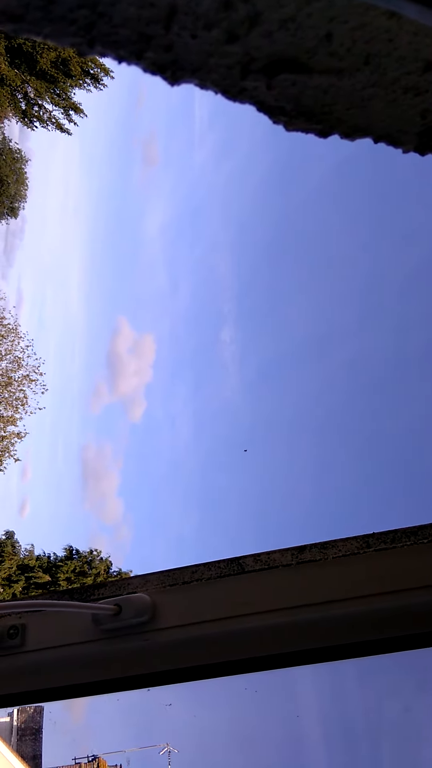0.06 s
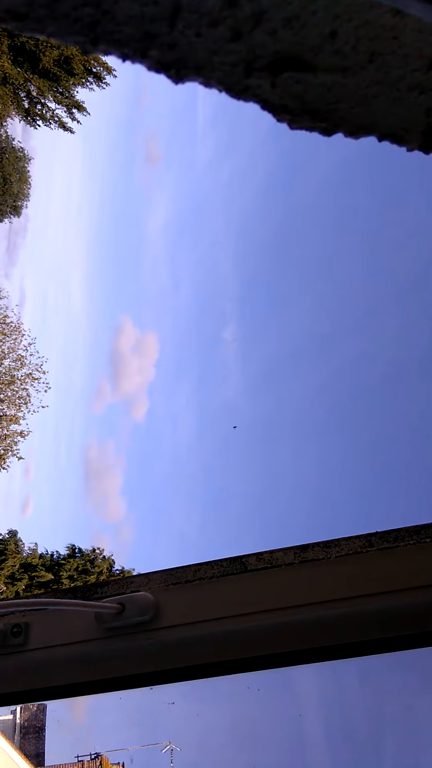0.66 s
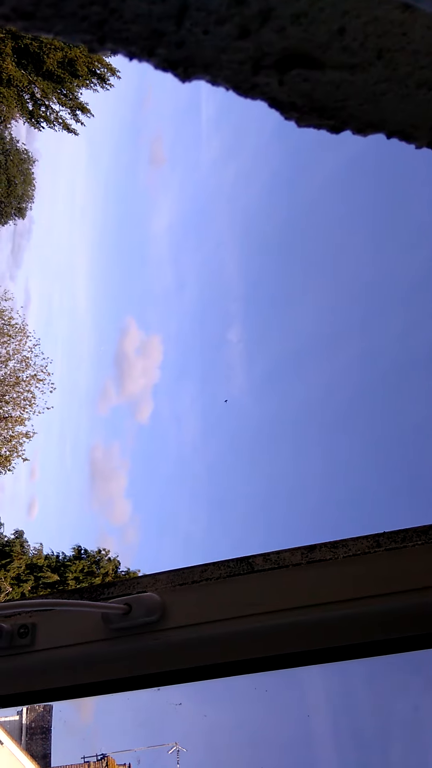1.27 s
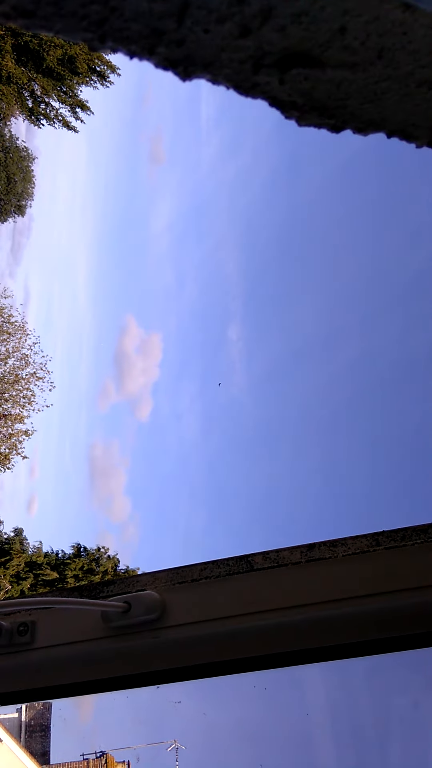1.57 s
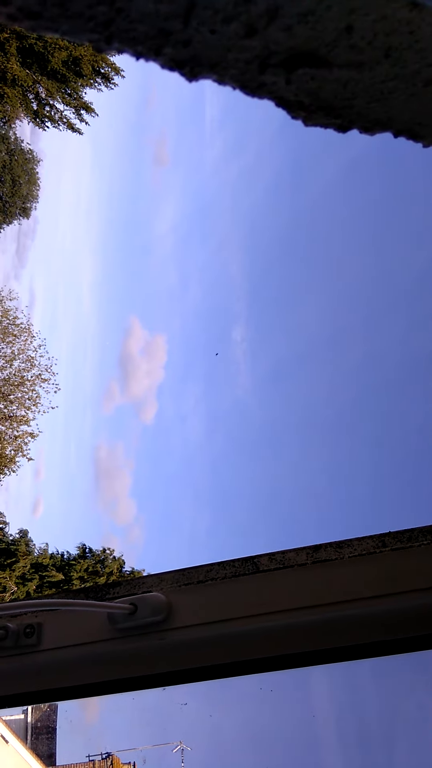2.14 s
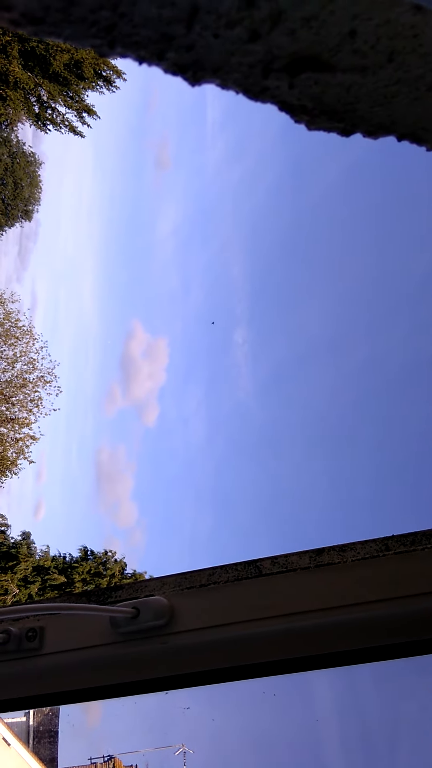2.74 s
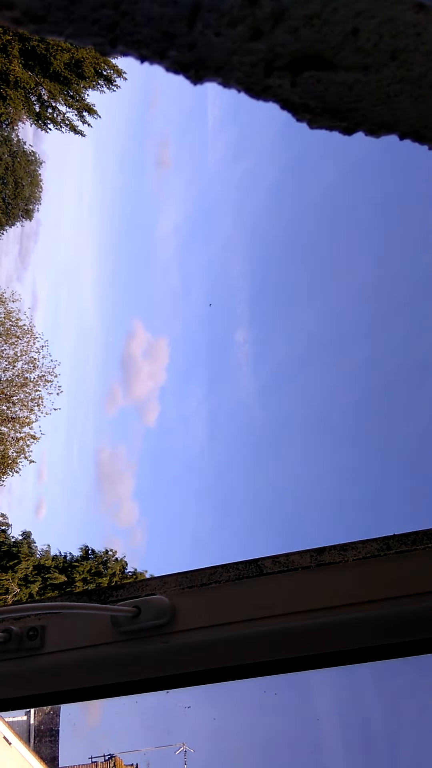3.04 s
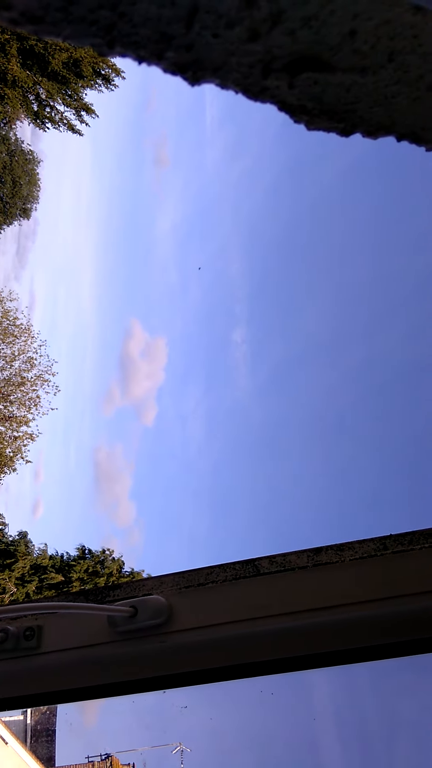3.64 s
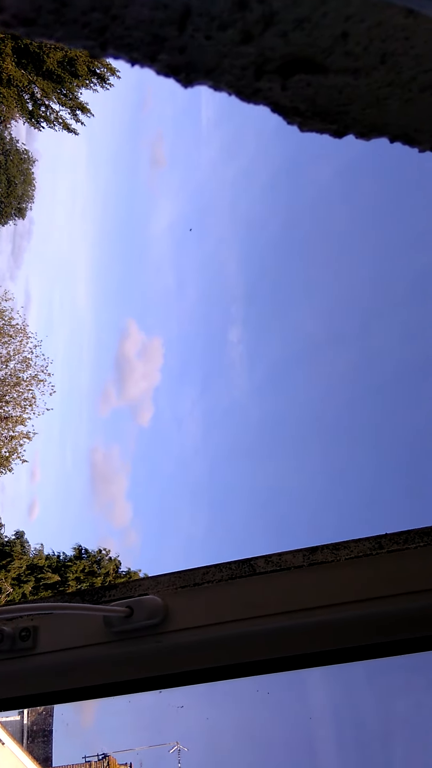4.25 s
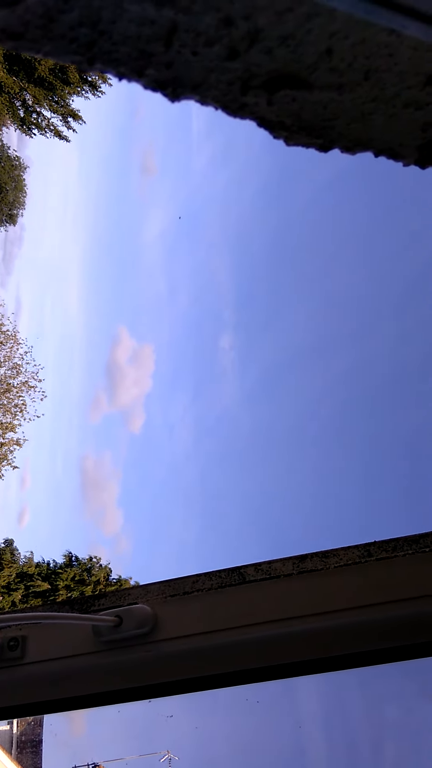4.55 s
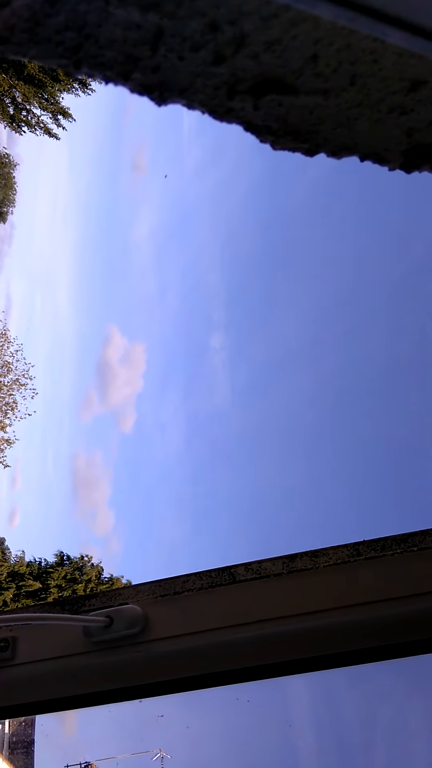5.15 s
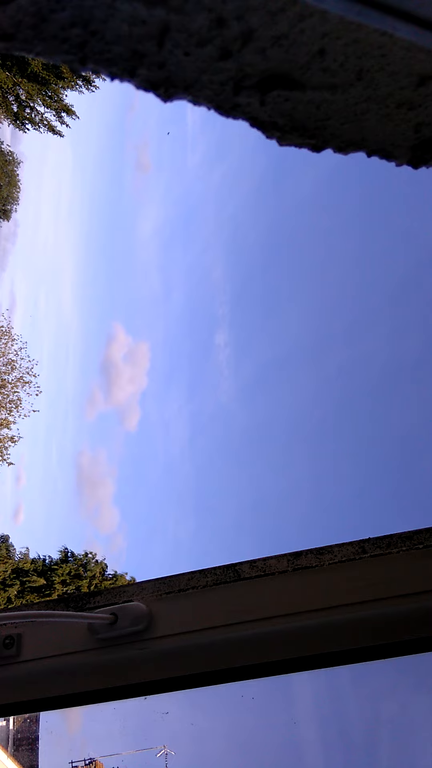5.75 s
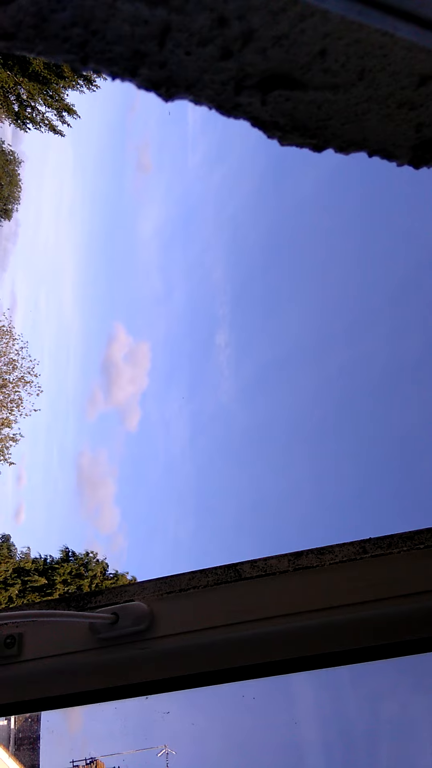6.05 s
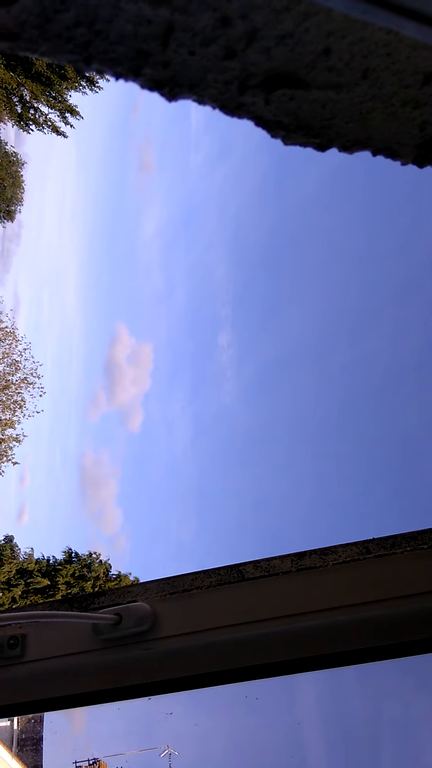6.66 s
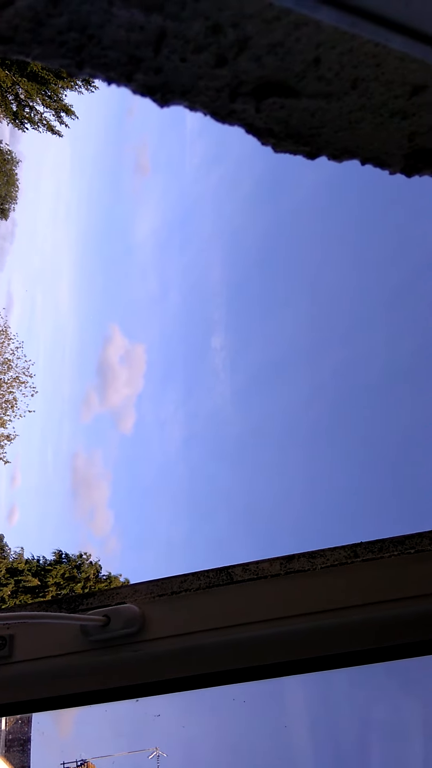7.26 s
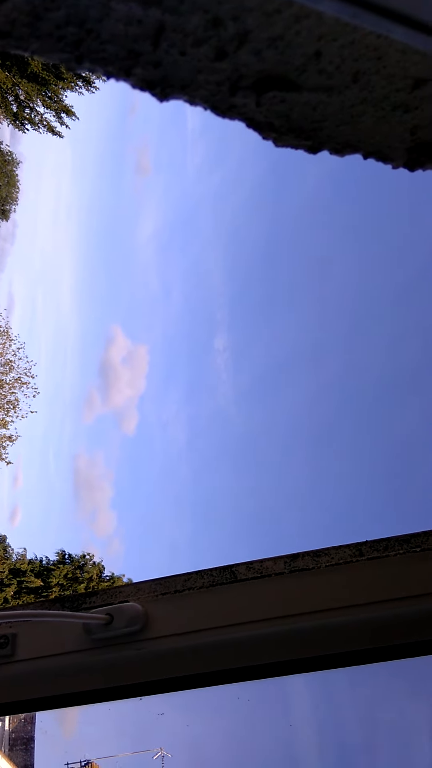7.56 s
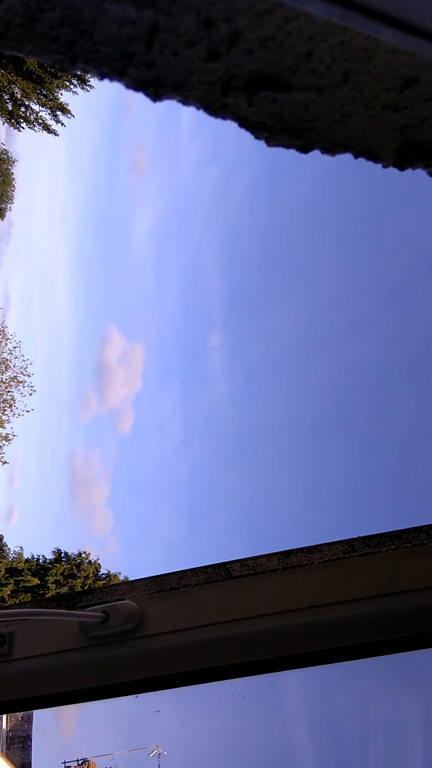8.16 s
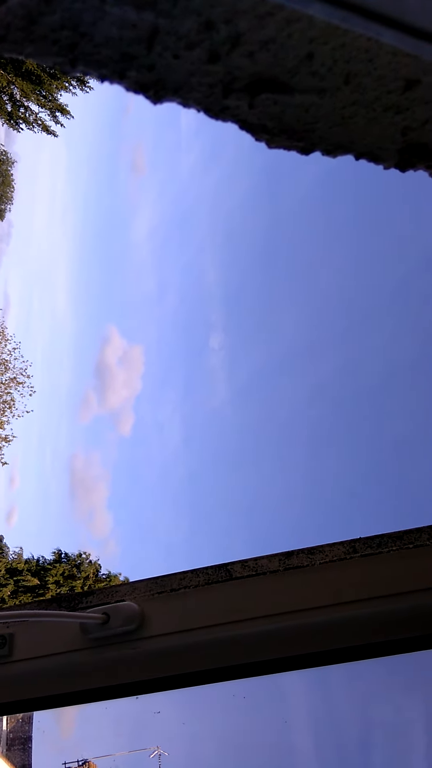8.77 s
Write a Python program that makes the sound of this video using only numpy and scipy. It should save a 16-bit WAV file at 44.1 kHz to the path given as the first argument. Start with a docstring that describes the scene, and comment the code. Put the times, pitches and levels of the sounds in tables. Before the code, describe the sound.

A quiet, steady murmur of far traffic and a faint microphone hiss run throughout, outdoors. A distant engine drones at a low, even pitch, swelling from about 2 seconds, strongest between 3 and 5.5 seconds, with a faint moan near 4.4 seconds, then thinning and wavering. A breeze touches the microphone from about 1 second, making soft, dull rumbles and bumps between 2 and 3.6 seconds. It drops away around 4 seconds. From about 5.2 seconds stronger gusts buffet the microphone with irregular low thumps, flutter and pops, well above the background. They hit hardest near 6.2 seconds, from 7 to 7.4 seconds and from 8.2 to 8.5 seconds, continuing until the end near 9 seconds. One thin, far bird note at about 6.5 seconds and a few tiny ticks are barely audible in the hiss.

```python
"""Far traffic murmurs outdoors and a distant engine drones at the harmonics of its firing rate,
swelling and fading, with a faint moan at its height. A breeze starts to buffet the microphone:
its turbulent pressure makes soft rumbles first, then gusts whose small eddies pop against the port.
One thin far bird note and a few tiny ticks sit in the microphone's hiss."""
import sys
import numpy as np
from scipy import signal
from scipy.fft import rfft, irfft, next_fast_len
from scipy.io import wavfile
from scipy.ndimage import uniform_filter1d

SR = 44100
rng = np.random.default_rng(int(sys.argv[2]) if len(sys.argv) > 2 else 0)


def generate_wav(sig):
    """Save sig (samples, or channels by samples) to the path in sys.argv[1] as 16-bit PCM at SR."""
    pcm = np.round(np.clip(np.atleast_2d(sig).T, -1, 1) * 32767).astype(np.int16)
    wavfile.write(sys.argv[1], SR, pcm)


N = 388521
TIME = np.arange(N) / SR


def gain_of(db):
    """Amplitude ratio of a level in decibels."""
    return 10 ** (np.asarray(db) / 20)


def spectrum_db(points, hz):
    """Level of a spectrum at hz, interpolated on a logarithmic frequency axis."""
    f, level_db = np.transpose(points)
    return np.interp(np.log(hz + 1), np.log(f + 1), level_db)


def follow(rows):
    """Linear interpolation of rows (time, values...) at every sample."""
    times, *columns = np.transpose(rows)
    return [np.interp(TIME, times, column) for column in columns]


def add(mix, start_s, sound):
    """Superposition: the sound adds to the mix from start_s on."""
    part = mix[round(start_s * SR):][:len(sound)]
    part += sound[:len(part)]


def noise(shape):
    """Spectral shaping: white noise is given the amplitude spectrum shape(Hz) and scaled to rms 1."""
    size = next_fast_len(N)
    white = rfft(rng.standard_normal(size))
    shaped = irfft(white * shape(np.fft.rfftfreq(size, 1 / SR)), size)[:N]
    return shaped / np.sqrt(np.mean(shaped ** 2) + 1e-20)


def drift(rate_hz):
    """Random modulation of rms 1: noise low-passed at about rate_hz."""
    return noise(lambda f: np.exp(-(f / rate_hz) ** 2))


def hiss():
    """Microphone self-noise; amplitude modulation of a top treble band adds flicker and ticks."""
    # self-noise spectrum: (frequency [Hz], spectral density [dB])
    colour = [(500, -7.5), (2500, -2.5), (4200, -1.5), (6500, -5), (8500, -6), (10500, -4), (12100, -4),
              (13000, 0), (14300, -5.5)]
    # tiny bright ticks: (time [s], level [dB])
    ticks = [(1.995, -72), (3.379, -68), (5.222, -69), (5.888, -70), (5.962, -68), (6.347, -68)]
    steady = gain_of(-72) * noise(lambda f: gain_of(spectrum_db(colour, f)))
    treble_gain = gain_of(-83 + 3 * drift(30) + 1.3 * drift(7))
    for s, db in ticks:
        add(treble_gain, s, gain_of(db) * np.exp(-TIME[:SR // 10] / 0.0056))
    return steady + treble_gain * noise(lambda f: np.exp(-((f - 11800) / 1200) ** 2))


def traffic():
    """Many far vehicles sum incoherently; air absorption and screening by houses take the treble."""
    # spectrum of the murmur: (frequency [Hz], spectral density [dB])
    colour = [(15, -1), (55, -0.5), (130, -3), (220, -4.5), (330, -10.5), (450, -11.5), (850, -10.5),
              (1200, -14.5), (1700, -18.5), (2200, -29.5), (3200, -45)]
    # its slow swell: (time [s], level [dB])
    swell = [(0, -58), (1.5, -57), (3, -56.5), (4.5, -57), (5.5, -56), (6.6, -56.5), (7.7, -57),
             (8.81, -55.5)]
    murmur = noise(lambda f: gain_of(spectrum_db(colour, f)))
    return murmur * gain_of(follow(swell)[0] + 0.08 * drift(5))


def bird():
    """One far note: a nearly pure tone with slight random frequency modulation."""
    # course of the note: (time [s], frequency [Hz], level [dB])
    note = [(6.41, 5190, -96), (6.46, 5200, -86), (6.5, 5220, -78), (6.54, 5170, -89), (6.68, 5210, -96)]
    hz, level_db = follow(note)
    sounding = (TIME > note[0][0]) & (TIME < note[-1][0])
    cycles = np.cumsum(hz * (1 + 0.002 * drift(40))) / SR
    return np.sqrt(2) * sounding * gain_of(level_db) * np.sin(2 * np.pi * cycles)


def moan(peak_s=4.43, width_s=0.28, hz=512, width_hz=10, level_db=-65):
    """Narrow-band noise is heard as a pitch: a faint tone that swells once above the drone."""
    swell = np.exp(-((TIME - peak_s) / width_s) ** 2)
    return gain_of(level_db) * swell * noise(lambda f: np.exp(-((f - hz) / width_hz) ** 2))


def engine():
    """Periodic firing gives a harmonic series, which fades in and out in moving air, over exhaust rush."""
    # course of the drone: (time [s], firing rate [Hz], level [dB], gain of upper harmonics and rush [dB])
    drone = [(0, 81.64, -60, -1), (1.2, 82.1, -60.5, 2.5), (1.7, 81.9, -66.5, 7.5), (2.3, 81.2, -56, 1.5),
             (3.2, 81.1, -50.5, -9), (3.8, 82.04, -49, -3), (4.5, 80.9, -49.5, -1), (5.3, 81.8, -48.5, -1),
             (6, 81.54, -53, 4.5), (6.55, 81.36, -66, 17), (7.7, 80.75, -55, 3.5), (8.81, 81.9, -58, 9)]
    # harmonics of the firing rate: (harmonic number, relative level [dB])
    harmonics = [(1, -7), (2, 0), (3, -15), (4, -15), (5, -21), (6, -28.5), (7, -28), (8, -33.5)]
    # exhaust resonances: (centre frequency [Hz], width [Hz], relative level [dB])
    exhaust = [(276, 48, 1), (480, 40, -6)]
    firing_hz, level_db, bright_db = follow(drone)
    cycles = np.cumsum(firing_hz * (1 + 0.00385 * drift(5.33))) / SR
    tone = np.zeros(N)
    for k, db in harmonics:
        upper = k > 2
        fading_db = (2.5 if upper else 0.7) * drift(4.1)
        partial = np.sin(2 * np.pi * (k * cycles + rng.random()))
        tone += gain_of(db + upper * bright_db + fading_db) * partial
    rush = noise(lambda f: sum(gain_of(db) * np.exp(-((f - hz) / width) ** 2)
                               for hz, width, db in exhaust))
    return gain_of(level_db) * (np.sqrt(2) * tone + gain_of(bright_db - 16.5) * rush)


def airflow(lumps_db=5, breeze_reach_hz=103):
    """Breeze and gusts add in power; gives the level and the reach, the span of a 20 dB spectral fall."""
    # light breeze between gusts: (time [s], level [dB])
    breeze = [(0, -78), (0.95, -72), (1.1, -56.5), (1.9, -56.5), (2.5, -49), (3.7, -50), (4.1, -62),
              (4.45, -66), (4.57, -52), (5.0, -45.5), (5.55, -49), (6.5, -48.5), (7.6, -46), (8.81, -46)]
    # gusts at the microphone: (peak time [s], duration [s], level [dB], reach [Hz])
    gusts = [(1.14, 0.16, -48, 116), (1.425, 0.095, -52.5, 102), (1.758, 0.08, -49, 98),
             (2.064, 0.062, -40, 125), (2.297, 0.043, -38.5, 170), (2.615, 0.28, -48.5, 108),
             (2.828, 0.037, -32.5, 105), (2.912, 0.072, -35, 153), (2.988, 0.045, -30.5, 123),
             (3.134, 0.067, -40, 115), (3.454, 0.039, -32, 146), (3.505, 0.04, -36, 120),
             (3.606, 0.15, -44, 107), (5.247, 0.064, -35, 196), (5.386, 0.079, -27.5, 292),
             (5.446, .04, -39, 180), (5.63, 0.059, -29, 276), (5.818, 0.087, -33, 153),
             (6.056, 0.063, -30.5, 223), (6.175, 0.086, -31.5, 402), (6.269, 0.074, -22, 249),
             (6.364, 0.052, -31, 214), (6.674, 0.053, -27.5, 198), (6.885, 0.17, -39.5, 120),
             (7.008, 0.052, -21.5, 310), (7.088, 0.061, -25, 290), (7.205, 0.072, -27.5, 225),
             (7.29, 0.084, -25.5, 605), (7.411, .12, -23.5, 179), (7.551, 0.091, -33, 208),
             (7.828, .11, -31.5, 147), (7.936, 0.16, -38.5, 160), (8.241, 0.046, -24.5, 400),
             (8.396, 0.087, -24, 339.5), (8.461, 0.063, -26, 380), (8.566, .06, -37.5, 98),
             (8.66, 0.046, -31, 200), (8.75, 0.073, -30.5, 230)]
    power = gain_of(follow(breeze)[0] + lumps_db * drift(4)) ** 2
    weighted_reach = power * breeze_reach_hz
    for s, length, db, reach_hz in gusts:
        near = slice(max(round((s - 2 * length) * SR), 0), round((s + 2 * length) * SR))
        age = (TIME[near] - s) / length
        rise, fall = abs(age / 0.555) ** 3.5, abs(age / 0.6) ** 2.6
        swell = np.exp(-np.where(age < 0, rise, fall))
        gust_power = (gain_of(db) * swell) ** 2
        power[near] += gust_power
        weighted_reach[near] += gust_power * reach_hz * swell ** 0.28  # reach shrinks as the gust weakens
    return 10 * np.log10(power), weighted_reach / power


def turbulence(level_db, reach_hz, pivot_hz=57.5, flutter_db=7.5):
    """Turbulent pressure at the port falls exponentially with frequency; faster air flattens the fall."""
    # buffeting spectrum before the tilt: (frequency [Hz], spectral density [dB])
    buffet = [(10, 4), (45, 0.9), (100, 0.8), (200, -2), (320, -3), (600, -10), (1200, 2), (2200, -40)]
    centres = 1500 * np.linspace(0, 1, 13) ** 2
    widths = np.gradient(centres)
    flutter = drift(59)  # small eddies come in clumps, which the upper bands share
    pressure = np.zeros(N)
    for hz, width, triangle in zip(centres[1:-1], widths[1:-1], np.eye(len(centres))[1:-1]):
        band = noise(lambda f: np.sqrt(np.interp(f, centres, triangle)))
        # the air speed, more than chance, sets each band's strength from moment to moment
        envelope = abs(signal.hilbert(band, next_fast_len(N))[:N])
        power = uniform_filter1d(envelope ** 2 / 2, size=1000)
        steadied = band / np.sqrt(power + 0.14)
        colour_db = spectrum_db(buffet, hz) - 20 * max(hz - pivot_hz, 0) / reach_hz
        clumps_db = flutter_db * min(hz / 300, 1) * flutter
        pressure += steadied * np.sqrt(width / 110) * gain_of(colour_db + clumps_db)
    return pressure * gain_of(level_db)


def shed_eddies(level_db, reach_hz, per_s=80, min_reach_hz=240):
    """Fast air sheds lesser eddies at random, scaled to its level: rows as eddy_pops takes them."""
    at = np.flatnonzero(rng.random(N) < per_s / SR)
    strength, spread = rng.standard_normal((len(at), 2)).T
    peak_db = level_db[at] - 5.5 + 0.5 * strength
    centre_hz = 213 * np.exp(0.15 * spread)
    rows = np.column_stack([TIME[at], peak_db, centre_hz])
    return list(rows[reach_hz[at] > min_reach_hz])


def eddy_pops(rows, rolloff=1.63, edge_hz=2300):
    """Each eddy is a bipolar pressure pulse, one push and pull; the smaller it is, the sharper the pop."""
    pressure, window = np.zeros(N), np.hanning(4096)
    f = np.fft.rfftfreq(len(window), 1 / SR)
    for (s, db, hz), angle in zip(rows, rng.uniform(0, 2 * np.pi, len(rows))):
        spectrum = f / hz * np.exp(-(f / hz) ** rolloff / rolloff) * np.exp(-(f / edge_hz) ** 8)
        analytic = np.fft.fftshift(np.fft.ifft(spectrum, len(window))) * window
        # the angle at which it meets the port decides whether push or pull comes first
        pulse = (analytic * np.exp(1j * angle)).real / abs(analytic).max()
        add(pressure, s - len(window) / 2 / SR, gain_of(db) * pulse)
    return pressure


def wind():
    """Flow noise at the microphone: a dull breeze grows into gusts that flutter higher and shed eddies."""
    # the hardest eddies to hit the port: (time [s], envelope peak level [dB], centre frequency [Hz])
    hard_eddies = [(2.29, -35, 130), (2.99, -27, 59.3), (3.5, -25.5, 45), (5.386, -23.5, 235),
                   (5.638, -30, 236.2), (6.167, -20.5, 213.4), (6.21, -24, 250), (6.247, -13.5, 175),
                   (6.67, -27.5, 220), (6.995, -20.5, 236), (7.085, -24, 260), (7.101, -25.5, 239.3),
                   (7.12, -24, 226.8), (7.257, -14, 423), (7.266, -12.5, 295), (7.285, -10.5, 276),
                   (7.305, -12, 478), (7.325, -15, 254), (7.355, -12, 243), (7.497, -28, 170.1),
                   (7.849, -27, 135), (8.229, -13.5, 265), (8.238, -17, 253.4), (8.36, -14, 218.7),
                   (8.388, -23, 290.5), (8.4, -20.5, 263.3), (8.425, -21, 230), (8.445, -21, 244.4),
                   (8.476, -16, 174)]
    level_db, reach_hz = airflow()
    rumble = turbulence(level_db, reach_hz)
    return rumble + eddy_pops(list(hard_eddies) + shed_eddies(level_db, reach_hz))


def scene():
    """Superposition of the far background, the hiss and the wind in one channel."""
    return (traffic() + engine() + bird() + hiss() + wind() + moan())[None]


def record(dry, edge_hz=14300):
    """Band limiting: a linear-phase low-pass filter removes the highest treble."""
    lowpass = signal.firwin(1023, edge_hz, window=("kaiser", 9), fs=SR)
    return signal.oaconvolve(dry, lowpass[None], "same")


dry = scene()
out = record(dry)
generate_wav(out)
```